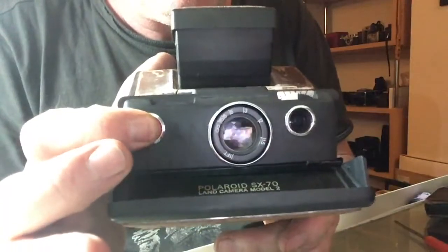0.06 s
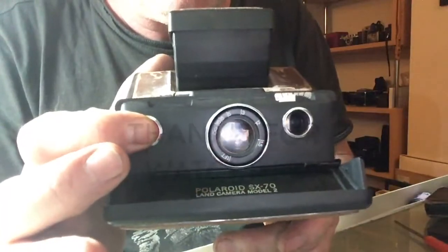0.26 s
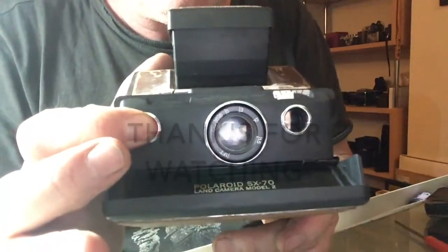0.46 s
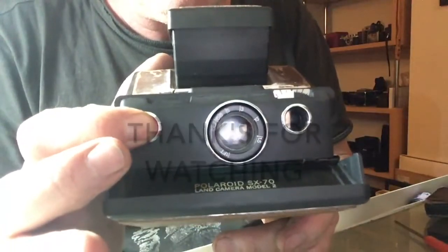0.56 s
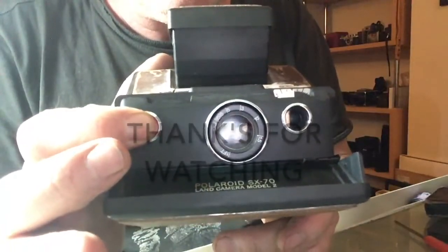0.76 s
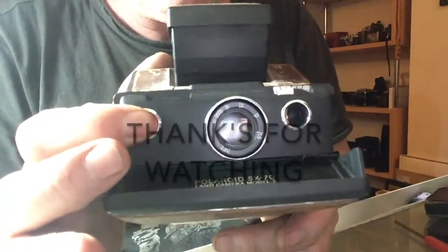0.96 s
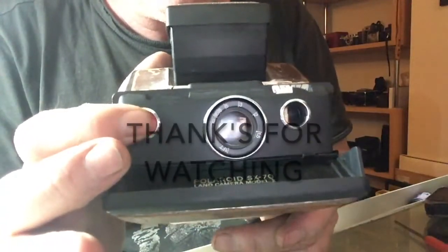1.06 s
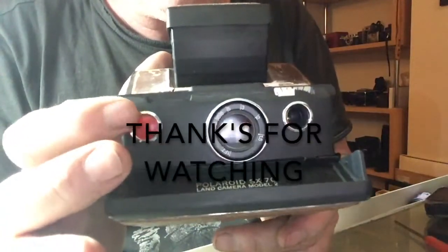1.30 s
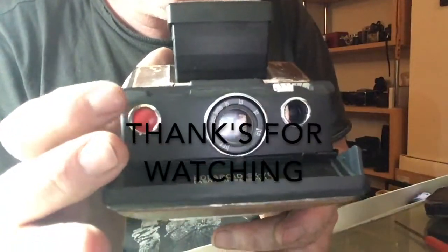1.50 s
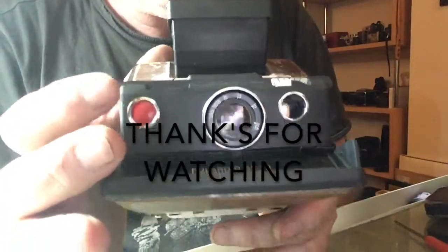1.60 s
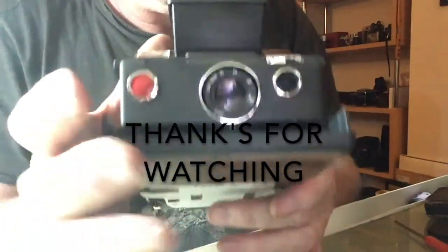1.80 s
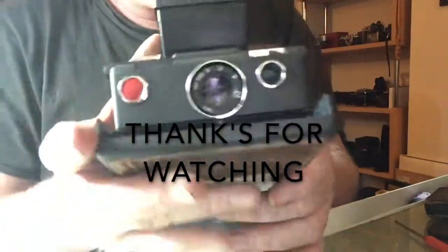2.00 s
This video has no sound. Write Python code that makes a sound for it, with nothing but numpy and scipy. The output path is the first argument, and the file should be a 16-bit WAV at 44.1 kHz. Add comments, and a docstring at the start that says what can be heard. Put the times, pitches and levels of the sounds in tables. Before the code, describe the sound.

An instant camera works close up in a small, quiet room. Its button ticks softly at the start, and a latch snaps at about 0.2 seconds. The small motor spins up and whirs steadily with rattling gears until a loud, sharp clack near 1.6 seconds. It quickly runs down, a spring buzzes faintly, and hands shift softly on the case around 1.9 seconds.

```python
"""Instant camera, close up

In a small room a button ticks, a latch snaps, and a small motor whirs through a rattling gear train
to push out the picture. The mechanism ends on a sharp clack; the motor runs down, a spring sings on,
and hands shift on the case."""
import sys
import numpy as np
from scipy import signal
from scipy.fft import rfft, irfft, next_fast_len
from scipy.io import wavfile

SR = 44100
rng = np.random.default_rng(int(sys.argv[2]) if len(sys.argv) > 2 else 0)


def inscribe(sig):
    """Save sig as 16-bit PCM at rate SR to the path in sys.argv[1].

    A 1-D sig is mono; a 2-D sig holds one channel per row.
    Samples are clipped to [-1, 1] before scaling.
    """
    pcm = np.round(np.clip(np.atleast_2d(sig).T, -1, 1) * 32767)
    wavfile.write(sys.argv[1], SR, pcm.astype(np.int16))


N = 90404
T = np.arange(N) / SR

# room air (frequency [Hz], relative level [dB])
AIR_SPECTRUM = [(25, -5.5), (60, -4), (160, -3), (300, -10), (700, -13.5), (2000, -22), (6000, -28),
                (15000, -32.5)]
# mains hum (frequency [Hz], level [dB])
HUM_TONES = [(100, -82.5), (149, -76.5)]
# room decay (frequency [Hz], T60 [s])
ROOM_T60 = [(150, 0.55), (1000, 0.2), (4000, 0.26), (14000, 0.15)]
# hands rubbing the case (time [s], level [dB])
RUB_LEVEL = [(0, -42.5), (.02, -47), (.05, -55), (.09, -63.5), (.16, -87), (.22, -77), (1.75, -80),
             (1.872, -65.5), (1.9, -60), (1.916, -57), (1.928, -62.5), (1.95, -57), (1.962, -72.5),
             (2.05, -74)]
# finger bumps (time [s], level [dB], fade [s])
FINGER_BUMPS = [(1.877, -54.5, 0.0096), (1.944, -54, 0.0058)]
# hands on the case (frequency [Hz], relative level [dB])
HAND_SPECTRUM = [(40, -11), (120, -19.5), (210, -0.5), (380, -10.5), (640, 3.5), (850, -15), (1400, -7.5),
                 (3000, -16.5), (6000, -23), (15000, -33.5)]
# strong spring harmonics (order, base level [dB], swell [dB])
SPRING_HARMONICS = [(1, -84, 5), (3, -68.5, -7), (4, -68.5, -13), (6, -69, -12), (8, -72, 13), (10, -80, 9),
                    (11, -70, 1), (12, -81, 14), (15, -70, -4), (18, -75, -2), (19, -82, 9), (20, -79, 6),
                    (22, -72, -11), (27, -85, 11)]
# spring envelope (time [s], gain [dB])
SPRING_GAIN = [(1.571, -13), (1.68, 1), (1.78, 0.5), (1.85, -8.5), (1.9, -16), (2.04, -36)]
# stop and case knocks (time [s], peak [dB], rise [s], frequency [Hz])
KNOCK_EVENTS = [(1.5652, -25.5, 0.0025, 3208), (1.6065, -32, 0.0024, 676.7), (1.877, -54.5, 0.0019, 1030),
                (1.909, -50.5, 0.0052, 660)]
# button, latch and stop (time [s], level [dB], fade [s], tilt [dB/octave], latch ring [dB])
SNAP_EVENTS = [(.007, -39.5, 0.0037, -2.5, 11), (0.0596, -36.5, 0.0025, -4, 11.5),
               (0.222, -38, 0.012, -3, 14), (0.2342, -17, 0.0019, -1.5, 14.5), (0.25, -33, 0.0025, 7, -2),
               (1.5699, -5.5, 0.00082, 3.5, -3), (1.5709, -11.5, 0.0016, -0.5, 6.5),
               (1.651, -42.5, 0.0047, -2.5, 5.5)]
# snaps (frequency [Hz], relative level [dB])
SNAP_SPECTRUM = [(60, -25), (300, -19.5), (700, -2.5), (1400, -9.5), (2100, -1.5), (5000, -7), (7000, 2),
                 (12500, -2), (14200, -8), (16000, 0)]
# metal resonances (frequency [Hz], width [Hz], gain [dB])
METAL_MODES = [(4040, 210, 7.5), (6050, 250, 5), (7700, 700, 1.5), (8730, 280, -4.5), (9420, 720, 10.5),
               (11060, 530, 2), (12500, 340, 6.5)]
# case resonances (frequency [Hz], width [Hz], heavy load [dB], late feed [dB])
CASE_MODES = [(2483.5, 150, -2, -2.5), (3468, 162, 6, 9), (4294, 600, 4.5, 7), (4810, 520, -6.5, -4.5),
              (5265, 320, 11, 8.5), (6080, 280, 0.5, 4.5), (6870, 270, 4.5, 8.5), (7370, 340, 10.5, 8),
              (9200, 500, 2, 6.5), (11370, 410, 7.5, 4), (14750, 400, -2, 7.5)]
# gear load (time [s], stage [0 heavy, 1 light, 2 early feed, 3 and up late feed])
LOAD_STAGE = [(.46, 0.5), (.54, 1), (.7, 1), (.76, 2.5), (1.09, 2), (1.16, 3.5)]
# gear rattle (time [s], level [dB])
RATTLE_LEVEL = [(.222, -46), (.245, -50.5), (.28, -39), (.325, -38.5), (.35, -35.5), (.45, -35), (.48, -39),
                (.62, -38), (.655, -35.5), (.68, -37.5), (1.15, -37), (1.24, -36), (1.36, -37), (1.51, -36),
                (1.565, -33.5), (1.598, -35.5), (1.615, -44), (1.635, -76), (1.66, -80)]
# gear rattle (frequency [Hz], relative level [dB])
RATTLE_SPECTRUM = [(40, -30.5), (290, -29), (450, -11.5), (640, -4), (1000, -7), (1400, -1.5), (2200, -0.5),
                   (3000, -1), (6000, -1), (8200, .5), (12500, -0.5), (13900, -5.5), (15800, -14.5)]
# low gear chatter on run-up and run-down (time [s], level [dB])
CHATTER_LEVEL = [(.222, -46.5), (.245, -42.5), (.26, -39), (.3, -40), (.35, -77), (.5, -56), (1.5, -72),
                 (1.57, -58), (1.598, -42.5), (1.61, -45.5), (1.62, -51.5), (1.66, -74)]
# gear chatter (frequency [Hz], relative level [dB])
CHATTER_SPECTRUM = [(60, -38), (330, -43), (500, -8), (650, 0.5), (800, 0), (1000, -11), (1250, -4),
                    (2000, -12.5), (6000, -23.5)]
# motor shaft (time [s], speed [Hz])
MOTOR_SPEED = [(.222, 45), (.27, 111.9), (.3, 140.8), (.326, 158.9), (.348, 167.2), (.378, 170.9),
               (.45, 174.2), (.476, 175), (.548, 184.5), (.638, 184.2), (.712, 183.1), (.8, 179.7),
               (.98, 180.4), (1.148, 176.8), (1.31, 177.8), (1.51, 176), (1.562, 172.9), (1.6, 161.7),
               (1.62, 138.5), (1.66, 59.6)]
# whine envelope (time [s], gain [dB])
WHINE_GAIN = [(.222, -48), (.25, -17), (.29, -5), (.33, 3), (.45, 0), (.55, 0.5), (1.55, 0.5),
              (1.605, -1.5), (1.62, -10.5), (1.66, -28)]
# motor partial base levels (order, heavy [dB], light [dB], early feed [dB], late feed [dB])
MOTOR_PARTIALS = [(1, -59, -52.5, -48, -50), (2, -84, -78, -80, -72), (3, -58, -51, -55, -54.5),
                  (4, -49.5, -50, -53.5, -53), (5, -40, -57, -48, -46), (6, -64, -48.5, -50, -54.5),
                  (7, -37, -50.5, -48.5, -50.5), (8, -43, -54, -53, -48), (9, -58, -59, -57.5, -61),
                  (10, -77, -53, -48, -53), (11, -65, -51.5, -72, -61), (12, -55, -54.5, -60, -58),
                  (14, -59, -55.5, -50, -59)]
# hollow of the case (frequency [Hz], width [Hz], gain [dB])
CAVITY_MODES = [(700, 101, 6)]

AIR_DB, REVERB_DB, CUT_HZ = -69.5, -13, 16000
SPRING_HZ, SPRING_JITTER, SPRING_BUZZ_DB = 365.8, .0015, -67
SPRING_WEAK_DB, SPRING_DB_PER_ORDER, SWELL_S, SWELL_WIDTH_S = -77, -.28, 1.782, 0.04
LATCH_HZ, LATCH_WIDTH_HZ = 2930, 710
CASE_SWELL_DB, CASE_SWELL_HZ = 0.72, 22.5
TEETH_PER_TURN, TOOTH_SPREAD_DB, SCRAPE_GAIN, FLUTTER_DB = 12, 2.5, 1.32, 0.87
TURN_DEPTH, POLE_DEPTH, WHEEL_DEPTH, WHEEL_RATIO = 0.19, 0.13, 0.16, .52
FULL_SPEED_HZ, MOTOR_JITTER, SLOW_JITTER, SLOW_DB_PER_ORDER = 172.84, .004, .2, -3
WAVER_DB, WAVER_DB_PER_ORDER, WAVER_HZ = -0.1, 0.1486, 12


def amp(db):
    """dB to gain."""
    return 10 ** (np.asarray(db) / 20)


def unit(x):
    """Scale to rms 1."""
    return x / np.sqrt(np.mean(x ** 2) + 1e-20)


def curve(points):
    """Linear interpolation over time."""
    return np.interp(T, *np.transpose(points))


def level(points):
    """Gain from a dB curve, zero outside its span."""
    return amp(curve(points)) * (T >= points[0][0]) * (T <= points[-1][0])


def at_hz(points, hz):
    """Linear interpolation over log frequency."""
    points_hz, value = np.transpose(points)
    return np.interp(np.log(hz + 1), np.log(points_hz), value)


def resonance_db(modes, hz):
    """Summed resonance peaks and dips."""
    return sum(db / (1 + (2 * (hz - mode_hz) / width_hz) ** 2) for mode_hz, width_hz, db in modes)


def colour(x, spectrum, modes=(), tilt_db=0, size=4096):
    """Minimum-phase filter of unit energy; tilt per octave above 500 Hz."""
    hz = np.fft.rfftfreq(size, 1 / SR)
    db = at_hz(spectrum, hz) + resonance_db(modes, hz) + tilt_db * np.log2(np.maximum(hz, 500) / 500)
    cepstrum = irfft(np.log(amp(db)))
    causal_fold = np.r_[1, np.full(size // 2 - 1, 2), np.zeros(size // 2)]
    impulse = irfft(np.exp(rfft(cepstrum * causal_fold)))
    return signal.fftconvolve(x, impulse / np.linalg.norm(impulse))[:len(x)]


def drift(rate_hz):
    """Low-passed noise, rms 1."""
    size = next_fast_len(N, True)
    hz = np.fft.rfftfreq(size, 1 / SR)
    spectrum = rfft(rng.standard_normal(size)) / (1 + (hz / rate_hz) ** 4)
    return unit(irfft(spectrum, size)[:N])


def tone(cycles, rms_db):
    """Sine with random start phase."""
    return amp(rms_db) * np.sqrt(2) * np.sin(2 * np.pi * (cycles + rng.random()))


def burst(start_s, db, fade_s):
    """Fading cluster of tiny contacts."""
    envelope = (T >= start_s) * np.exp(-np.maximum(T - start_s, 0) / fade_s)
    return amp(db) * rng.choice([-1, 1], N) * envelope


def room_tone():
    """Quiet air and mains hum."""
    hum = sum(tone(hz * T, db) for hz, db in HUM_TONES)
    return amp(AIR_DB) * colour(rng.standard_normal(N), AIR_SPECTRUM) + hum


def reverb(x, size=256):
    """Short diffuse tail; each band decays at its own rate."""
    hz, age_s, noise = signal.stft(rng.standard_normal(SR // 2), SR, nperseg=size)
    decay = amp(-60 * age_s / at_hz(ROOM_T60, hz)[:, None])
    onset = np.minimum(age_s / 0.0028, 1)
    tail = signal.istft(noise * decay * onset, SR, nperseg=size)[1]
    return signal.fftconvolve(x, tail / np.linalg.norm(tail))[:N]


def hands():
    """Skin slips unevenly over the case; fingers bump it."""
    slips = unit(rng.standard_normal(N) * amp(1.2 * drift(140)))
    bumps = sum(burst(*row) for row in FINGER_BUMPS)
    return colour(slips * level(RUB_LEVEL) + bumps, HAND_SPECTRUM)


def spring():
    """The stop sets a spring buzzing, unsteady in pitch; its harmonics briefly shift balance."""
    swell = np.exp(-((T - SWELL_S) / SWELL_WIDTH_S) ** 2)
    cycles = np.cumsum(SPRING_HZ * (1 + SPRING_JITTER * drift(150))) / SR
    harmonic_db = {order: SPRING_WEAK_DB + SPRING_DB_PER_ORDER * order for order in range(1, 34)}
    for order, db, swell_db in SPRING_HARMONICS:
        harmonic_db[order] = db + swell_db * swell + 2 * drift(33)
    tones = sum(tone(order * cycles, db) for order, db in harmonic_db.items())
    buzz = amp(SPRING_BUZZ_DB) * colour(rng.standard_normal(N), RATTLE_SPECTRUM, tilt_db=-1)
    return (tones + buzz) * level(SPRING_GAIN)


def knocks():
    """Single modes ring as the stop engages, the gears halt and the grip changes."""
    out = np.zeros(N)
    for start_s, db, rise_s, hz in KNOCK_EVENTS:
        age_s = np.maximum(T - start_s, 0)
        envelope = age_s / rise_s * np.exp(1 - age_s / rise_s)
        out += amp(db) * envelope * np.sin(2 * np.pi * hz * age_s)
    return out


def snaps():
    """Button, latch and stop ring the metal parts; some snaps also ring the latch mode."""
    out = np.zeros(N)
    for start_s, db, fade_s, tilt_db, latch_db in SNAP_EVENTS:
        modes = [*METAL_MODES, (LATCH_HZ, LATCH_WIDTH_HZ, latch_db)]
        out += colour(burst(start_s, db, fade_s), SNAP_SPECTRUM, modes, tilt_db)
    return out


def case(drive):
    """Case resonances crossfade from heavy load to late feed; each swells on its own."""
    feed = curve(LOAD_STAGE) / LOAD_STAGE[-1][1]
    heavy = colour(drive, RATTLE_SPECTRUM, [(hz, width, db) for hz, width, db, _ in CASE_MODES])
    late = colour(drive, RATTLE_SPECTRUM, [(hz, width, db) for hz, width, _, db in CASE_MODES])
    spectrum = rfft((1 - feed) * heavy + feed * late)
    bin_hz = np.fft.rfftfreq(N, 1 / SR)
    mode_hz = [row[0] for row in CASE_MODES]
    out = np.zeros(N)
    for share in np.eye(len(CASE_MODES)):
        band = irfft(spectrum * np.interp(bin_hz, mode_hz, share), N)
        out += band * amp(CASE_SWELL_DB * drift(CASE_SWELL_HZ))
    return out


def gears(turns):
    """Uneven teeth tick and scrape, throb with the shaft and a slower wheel, and ring the case."""
    tooth_count = np.floor(TEETH_PER_TURN * turns + .12 * drift(900))
    contact = np.diff(tooth_count, prepend=0) > 0
    strength = amp(TOOTH_SPREAD_DB * np.clip(rng.standard_normal(N), -2, 2))
    ticks = unit(contact * strength * rng.choice([-1, 1], N))
    angle_rad = 2 * np.pi * turns
    shaft_throb = 1 + TURN_DEPTH * np.cos(angle_rad) + POLE_DEPTH * np.cos(2 * angle_rad)
    wheel_throb = 1 + WHEEL_DEPTH * np.cos(WHEEL_RATIO * angle_rad + drift(12))
    scrape = SCRAPE_GAIN * rng.standard_normal(N)
    flutter = amp(FLUTTER_DB * drift(42))
    drive = unit((ticks + scrape) * shaft_throb * wheel_throb * flutter)
    rattle = case(drive * level(RATTLE_LEVEL))
    chatter = colour(drive * level(CHATTER_LEVEL), CHATTER_SPECTRUM)
    return rattle + chatter


def slowness(speed_hz):
    """0 from full speed up, 1 at rest."""
    return np.maximum(1 - speed_hz / FULL_SPEED_HZ, 0)


def motor(speed_hz, turns):
    """Whine: wavering shaft harmonics follow the load, lifted by the case cavity, duller when slow."""
    stage = curve(LOAD_STAGE)
    out = np.zeros(N)
    for order, *stage_db in MOTOR_PARTIALS:
        db = np.interp(stage, np.arange(len(stage_db)), stage_db)
        db += resonance_db(CAVITY_MODES, order * speed_hz)
        db += SLOW_DB_PER_ORDER * order * slowness(speed_hz)
        db += (WAVER_DB + WAVER_DB_PER_ORDER * order) * drift(WAVER_HZ)
        out += tone(order * turns, db)
    return out * level(WHINE_GAIN)


def scene():
    """Camera and hands in the room, dual mono."""
    steady_hz = curve(MOTOR_SPEED)
    jitter = MOTOR_JITTER + SLOW_JITTER * slowness(steady_hz)  # a slow motor runs unevenly
    speed_hz = steady_hz * (1 + jitter * drift(70))
    turns = np.cumsum(speed_hz) / SR
    direct = motor(speed_hz, turns) + gears(turns) + snaps() + knocks() + spring() + hands()
    mono = direct + amp(REVERB_DB) * reverb(direct) + room_tone()
    return np.array([mono, mono])


def record(dry):
    """Linear-phase low-pass."""
    taps = signal.firwin(255, CUT_HZ, window=("kaiser", 9), fs=SR)
    return signal.oaconvolve(dry, taps[None], "same", axes=1)


dry = scene()
out = record(dry)
inscribe(out)
```